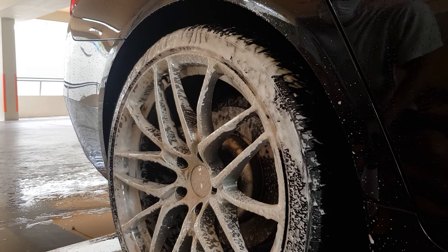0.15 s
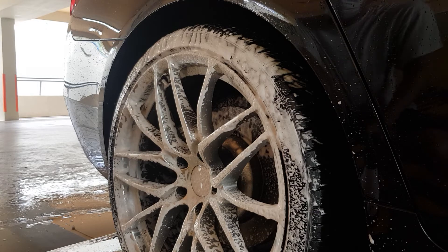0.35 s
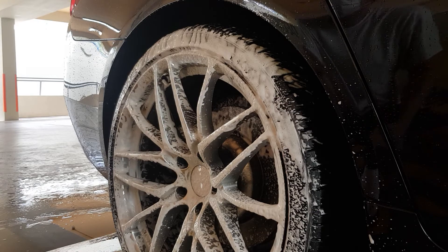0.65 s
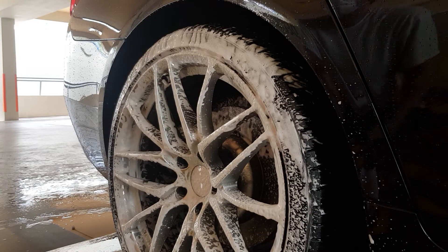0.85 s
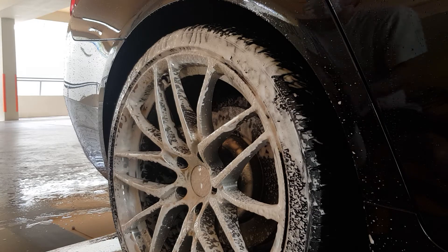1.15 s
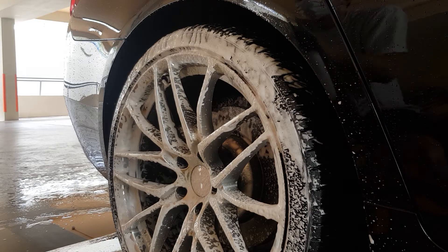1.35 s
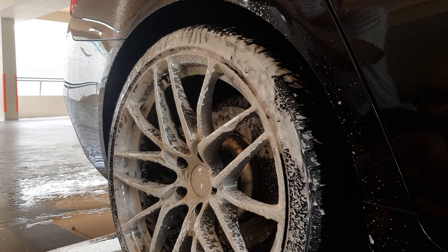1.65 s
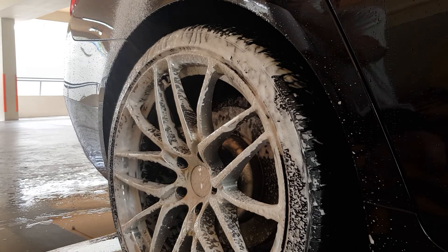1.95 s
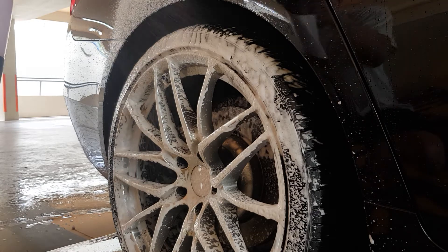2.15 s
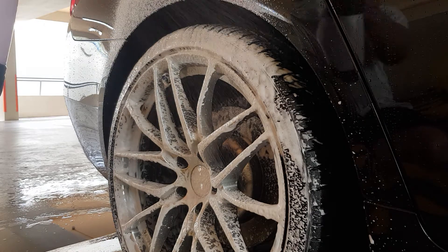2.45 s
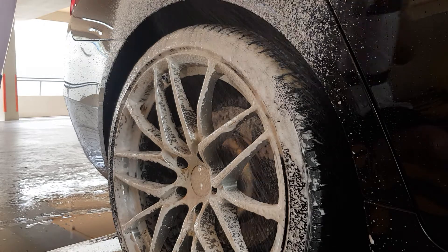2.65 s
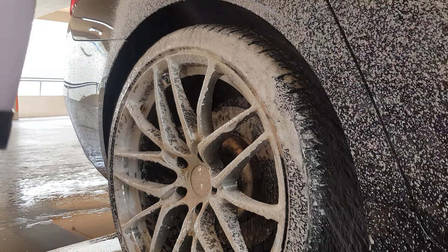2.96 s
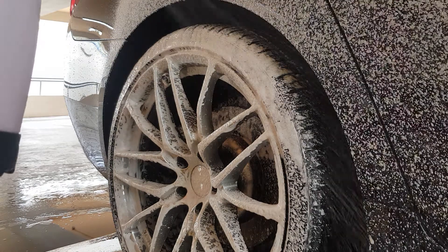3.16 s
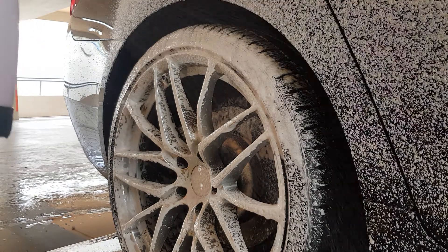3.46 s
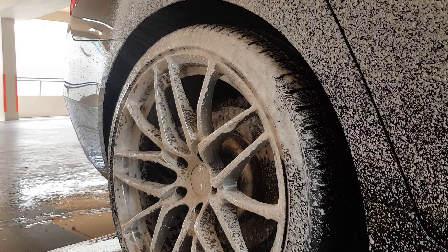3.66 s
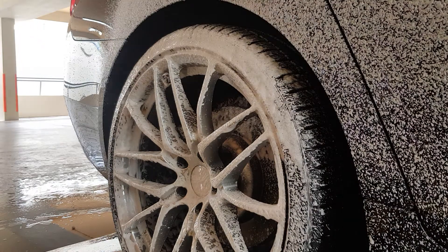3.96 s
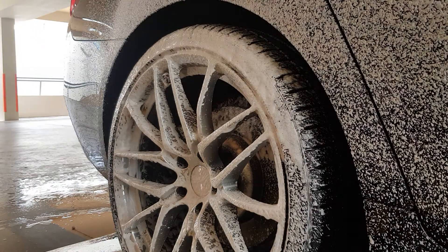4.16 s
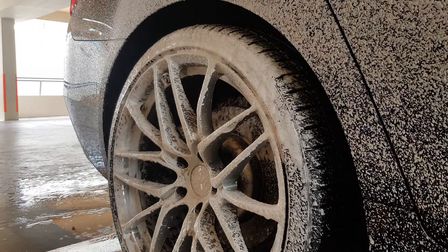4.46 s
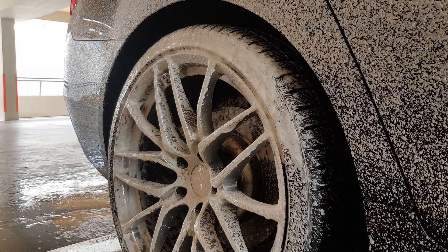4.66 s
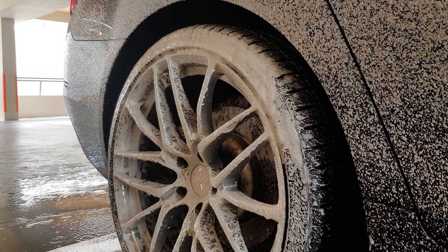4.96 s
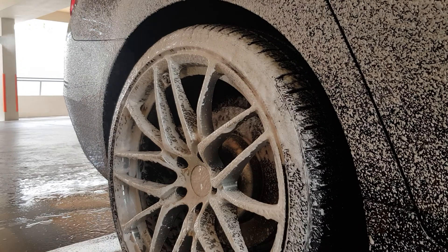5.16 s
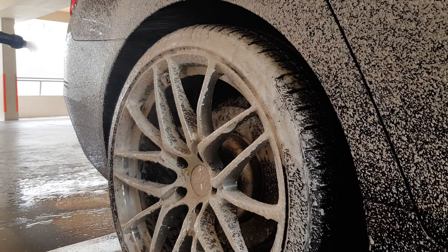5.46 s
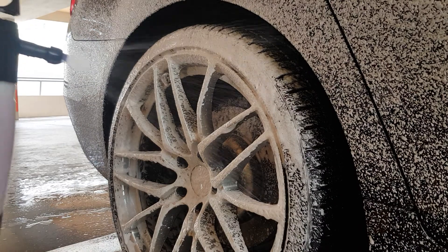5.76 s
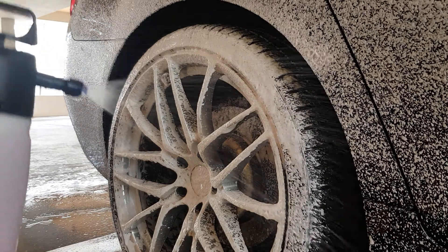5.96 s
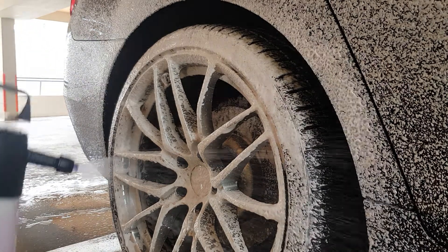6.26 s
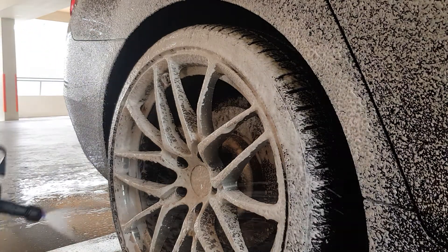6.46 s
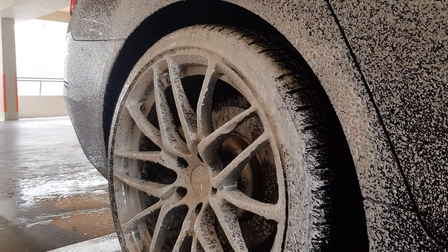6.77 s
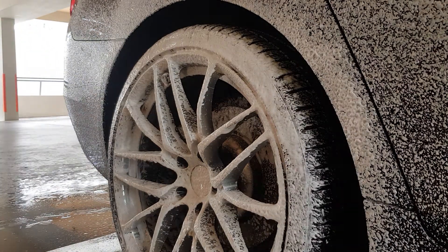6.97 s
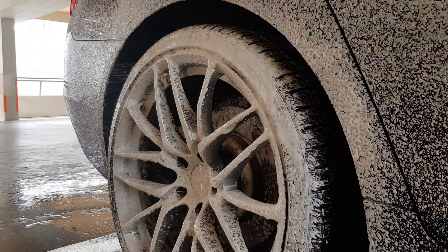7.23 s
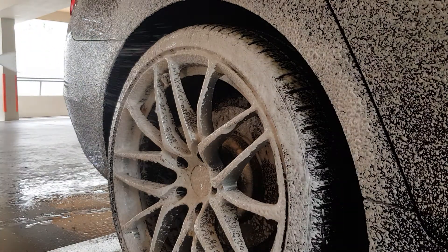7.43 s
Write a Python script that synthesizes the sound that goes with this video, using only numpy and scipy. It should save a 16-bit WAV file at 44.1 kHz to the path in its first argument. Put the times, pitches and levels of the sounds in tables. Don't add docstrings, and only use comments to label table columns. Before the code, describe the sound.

Low engine and traffic rumble fills an open parking garage. Close by, slightly left, a hand-pump sprayer gets one last stroke: plastic knocks, a short rising squeak, a hard clack and a fizz of escaping air that fades with small ticks. After about a second and a half the trigger opens with a sharp spurt, and a bright foam hiss continues to the end, swelling and thinning as it sweeps over wheel and panel. Close stereo phone microphone.

```python
import sys
import numpy as np
from scipy import signal
from scipy.fft import rfft, irfft
from scipy.io import wavfile
from scipy.ndimage import uniform_filter1d

SR = 44100
rng = np.random.default_rng(int(sys.argv[2]) if len(sys.argv) > 2 else 0)


def ratio(d):
    e = np.asarray(d, float) / 20
    return 10 ** e


def dump_mix(stems):
    frames = np.atleast_2d(stems).T
    limited = np.clip(frames, -1, 1)
    pcm = np.round(limited * 32767).astype(np.int16)
    wavfile.write(sys.argv[1], SR, pcm)


N = 335160
T = np.arange(N) / SR
F = np.maximum(np.arange(N // 2 + 1) * SR / N, 1)
LEFT_RIGHT = np.array([[1], [-1]])
TOP_HZ = 15790
VALVE_OPENS_S = .217
# (time [s], jet hiss [dB], left minus right [dB])
OPENING = [
    (1.5535, -62, -1),
    (1.557, -42, 1.5),
    (1.566, -27.5, 4),
    (1.573, -22, 4),
    (1.58, -22.5, 5),
    (1.592, -23, -1),
    (1.6, -30.5, 0.1),
    (1.635, -29.5, -1),
    (1.78, -33, -0.9),
]


def unit(x):
    return x / np.sqrt(np.mean(x ** 2))


def curves(rows):
    s, *columns = np.transpose(rows)
    return [np.interp(T, s, c) for c in columns]


def swells(rows):
    return sum(db * np.exp(-.5 * ((T - s) / (length / 2)) ** 2) for s, db, length in rows)


def walk(rate):
    k = int(SR / rate)
    held = np.repeat(rng.standard_normal(N // k + 1), k)
    return 1.3 * uniform_filter1d(uniform_filter1d(held, k), k)[:N]


def on_log_hz(points, hz):
    f, v = np.transpose(points)
    return np.interp(np.log(hz), np.log(f), v)


def shaped(x, gain):
    return irfft(rfft(x) * gain, N)


def band(lo_hz, hi_hz):
    return 1 / np.sqrt((1 + (lo_hz / F) ** 8) * (1 + (F / hi_hz) ** 8))


def modes(table):
    return sum(ratio(db) * 1j * F * w / (hz ** 2 - F ** 2 + 1j * F * w) for hz, w, db in table)


def humps(table):
    return np.sqrt(sum(np.abs(modes([row])) ** 2 for row in table))


def late(x, *delays_ms):
    fine = 4 * irfft(rfft(x), 4 * N)
    return [np.interp(4 * (T - ms / 1000) * SR, np.arange(4 * N), fine) for ms in delays_ms]


def traffic():
    # (time [s], frequency [Hz], level [dB])
    boom_rows = [(0.0, 60.6, -31.5), (0.32, 65.1, -27.5), (0.55, 57.2, -32.5), (0.99, 65.17, -33),
                 (1.2, 54.65, -33), (2.05, 58, -33.5), (2.24, 66.16, -35.5), (2.58, 67.5, -36),
                 (2.88, 55.7, -37), (3.64, 55.05, -32.5), (4.38, 61.35, -43), (4.68, 61.2, -37.5),
                 (4.78, 55, -34.5), (5.06, 61.1, -40), (5.29, 53.3, -44.5), (5.8, 50.6, -37),
                 (7.49, 57.6, -36.5), (7.6, 59.5, -46)]
    # (time [s], extra level [dB], length [s])
    throb_rows = [(.08, 3, 0.087), (.42, -3.5, .1), (1.42, 3, 0.05), (1.55, -4, 0.087), (1.69, 5.5, .1),
                  (1.95, 4, .08), (2.02, -4, .08), (2.35, 3, 0.2), (3.92, -10, .1), (4.0, 4, 0.057),
                  (4.21, 10, 0.067), (4.52, 3.5, 0.11), (4.73, 5, 0.091), (4.82, -8, 0.062), (5.37, 9, .1),
                  (5.88, 3.5, 0.11), (6.0, 4, 0.085), (6.6, -4, .2), (7.15, 2, 0.17)]
    # (time [s], extra level [dB], length [s])
    surge_rows = [(.9, 6, .25), (1.3, 7.5, 0.27), (1.7, 2.5, .15), (1.95, 5.5, 0.11), (2.37, 4, 0.17),
                  (3.0, 5.5, 0.19), (3.22, 2, 0.14), (3.82, 4.5, 0.18), (4.7, 5, 0.068), (4.82, 3.5, .15),
                  (5.37, 6.5, 0.077), (6.77, 1.5, .3)]
    # (time [s], frequency [Hz], level [dB])
    engine_rows = [
        (6.3, 106.5, -59),
        (6.408, 99.1, -37.5),
        (6.686, 104.5, -36.5),
        (7.078, 109, -37),
        (7.2, 105.7, -43),
        (7.6, 117.7, -33),
    ]
    # (time [s], extra level [dB], length [s])
    hum_rows = [(1.3, 10, .5), (1.7, 6.5, .2), (2.45, 13, .2), (2.95, 7.5, 0.42), (3.25, 14.5, 0.29),
                (4.2, 9, .4), (5.0, 6, .4)]
    # (time [s], level [dB])
    flow_rows = [(0, -42.5), (.35, -46), (1.6, -47), (3.0, -49.5), (4.0, -50.5), (4.6, -48.5), (5.2, -50),
                 (6.05, -47), (7.6, -48.5)]
    # (frequency [Hz], density [dB per Hz])
    hall_spectrum = [(88, -20), (150, -15), (182, -11.5), (447, -16.5), (588, -21), (623, -19.5),
                     (852, -21.5), (1530, -28), (2440, -36.5), (2750, -35.5), (15900, -70)]
    # (frequency [Hz], correlation [1])
    likeness_rows = [(60, 0.91), (130, 0.89), (290, 0.83), (640, 0.64), (1410, -0.85), (3100, -0.096),
                     (6820, -0.17), (15000, 0.31)]

    boom_hz, boom_db = curves(boom_rows)
    boom_db = boom_db + swells(throb_rows)
    wash_db, = curves(flow_rows)
    drone_db = -38.5 + 0.11 * (wash_db - wash_db.mean()) + swells(surge_rows)
    boom = np.sin(2 * np.pi * np.cumsum(boom_hz + 2.48 * walk(15)) / SR) * ratio(0.5 * walk(27.0))
    boom = unit(unit(boom) + 0.65 * unit(shaped(rng.standard_normal(N), band(51.4, 69.5) ** 2)))
    drone = unit(shaped(rng.standard_normal(N), band(86.6, 126.7) ** 2))
    engine_hz, engine_db = curves(engine_rows)
    engine = ratio(engine_db) * np.interp(T, [6.2, 6.4], [0, 1]) * np.sin(2 * np.pi * np.cumsum(engine_hz) / SR)
    hum = unit(shaped(rng.standard_normal(N), modes([(135.8, 9, 0)]) ** 2))
    hum = ratio(-57 + swells(hum_rows)) * hum

    likeness = np.clip(on_log_hz(likeness_rows, F), 0, 1)
    mid, side = rfft(rng.standard_normal((2, N))) * ratio(on_log_hz(hall_spectrum, F))
    wash = irfft(mid * np.sqrt(1 + likeness) + LEFT_RIGHT * side * np.sqrt(1 - likeness), N)
    reference_db = np.interp(1.3, T, uniform_filter1d(wash_db, SR // 3))
    wash = unit(wash) * ratio(-45.5 + wash_db - reference_db)
    side_bass = ratio(-22) * unit(shaped(rng.standard_normal(N), band(42, 153) ** 2)) * ratio(boom_db)
    bass = ratio(boom_db) * boom + ratio(drone_db - 2.5) * drone + engine + hum + LEFT_RIGHT * side_bass
    return (bass + wash) * ratio(-.6 * LEFT_RIGHT)


def vent():
    # (time [s], level [dB])
    rub_rows = [
        (0, -62),
        (.058, -46),
        (.09, -53),
        (.13, -56),
        (.16, -59),
        (.214, -52),
    ]
    # (time [s], level [dB])
    pressure_rows = [
        (.219, -36.5),
        (.262, -36),
        (.275, -50.5),
        (.42, -46.5),
        (.5, -50),
        (.62, -58.5),
        (.68, -57.5),
        (.9, -66),
        (1.0, -77),
    ]
    # (frequency [Hz], width [Hz], level [dB])
    tube_rows = [(1800, 600, 0), (2340, 500, -1), (3800, 500, -6), (4550, 450, -4), (7200, 900, -16)]
    # (frequency [Hz], width [Hz], level [dB])
    valve_rows = [(11200, 1000, -4), (12450, 1300, 0), (15200, 1400, 0)]
    # (frequency [Hz], width [Hz], level [dB])
    reed_rows = [(5440, 210, 0)]

    low_db, = curves(rub_rows + pressure_rows)
    gate, opened = np.interp(T, [.95, 1.15], [1, 0]), T > VALVE_OPENS_S
    age = T - VALVE_OPENS_S
    burst_db = 0.5 * (T < .268)
    high_db = low_db + np.where(opened, 1 - 2 * age + burst_db, 0)
    reed_db = low_db - 5.5 - 14 * age + burst_db
    rub, air, edge = rng.standard_normal((3, 2, N))
    tube = unit(shaped(air, humps(tube_rows) ** 1.5 + .03 * band(1000, 9000)))
    valve = unit(shaped(edge, humps(valve_rows) ** 2 + .04 * band(8000, SR)))
    tube = np.where(opened, tube, unit(shaped(rub, band(860, 4700) + .1 * band(4000, 8000))))
    valve = np.where(opened, valve, unit(shaped(rub, band(9000, SR))))
    reed = opened * unit(shaped(edge, modes(reed_rows) ** 2))
    tube = ratio(low_db + 2 * walk(61.4)) * tube
    valve = ratio(high_db + 1.8 * walk(61.2)) * valve
    reed = ratio(reed_db + 2.3 * walk(78.0)) * reed
    return gate * (tube + valve + reed)


def knocks():
    # (time [s], peak [dB], thud re peak [dB], clack re peak [dB], tick re peak [dB])
    blows = [(0.0601, -22.5, 7, -38, -18), (0.0726, -24, -19, -32, -7), (0.1216, -29.5, -15, -25, -20),
             (0.2161, -15.5, -15, -32, -39), (0.231, -36, -15, -10, -15), (0.2558, -27.5, -23, -2, -17),
             (0.43, -33.5, -14, -7, -11), (0.644, -38, -13, -29, -6), (0.6823, -47, 9, -22, -12),
             (0.731, -48, -7, -6, -15), (0.757, -55, -13, 10, -11), (0.779, -49, -2, -15, -15),
             (0.88, -42, -4, -24, -23), (0.9048, -39, -14, -28, -21), (0.935, -45, 5, -24, -23)]
    # (frequency [Hz], width [Hz], level [dB])
    tank_modes = [(790, 70, 10), (1634, 90, 5), (2450, 110, 7), (2730, 120, -2), (3540, 200, -4),
                  (3930, 200, -8)]
    # (frequency [Hz], width [Hz], level [dB])
    stop_modes = [(417, 326, 15), (980, 78, -11), (1930, 84, -11), (2530, 320, -7.5), (3430, 115, 4.5),
                  (5430, 95, -20)]

    noise = rng.standard_normal(N)
    ranges_hz = (1400, 5500), (400, 1400), (5500, 9000), (9000, TOP_HZ)
    body, thud, clack, tick = (unit(shaped(noise, band(*hz))) for hz in ranges_hz)
    on_tank, at_stop, bare = np.zeros((3, N))
    for s, db, thud_db, clack_db, tick_db in blows:
        age = np.maximum(T - s, 0)
        blow = ratio(db - 5.5) * (1 - np.exp(-age / 0.00031)) * ratio(-60 * age / 0.023)
        snaps = abs(s - VALVE_OPENS_S) < .005
        strike = 3 * snaps * np.exp(-age / .0015) * np.sin(2 * np.pi * 2750 * age)
        struck = at_stop if s > .2 else on_tank
        struck += blow * (body + ratio(thud_db) * thud + strike)
        bare += blow * (ratio(clack_db) * clack + ratio(tick_db) * tick)
    ringing = shaped(on_tank, modes(tank_modes) + 0.55) + shaped(at_stop, modes(stop_modes) + 0.22)
    return ratio(4.0) * ringing + bare


def squeak():
    # (time [s], frequency [Hz], level [dB])
    pitch_rows = [
        (.1, 830, -44),
        (.115, 880, -44),
        (.135, 935, -45),
        (.16, 965, -43),
        (.19, 995, -40),
        (.218, 1030, -34.5),
    ]
    # (multiple [1], level [dB])
    partials = [(1, 0), (2, -14), (3, -33), (4, -31), (5, -27), (6, -29), (7, -29), (8, -33)]
    hz, db = curves(pitch_rows)
    phase = 2 * np.pi * np.cumsum(hz * (1 + .004 * walk(156))) / SR
    gate = np.interp(T, [.092, .102, VALVE_OPENS_S, VALVE_OPENS_S + 0.005], [0, 1, 1, 0])
    tone = sum(ratio(p + 2 * walk(37) * (k > 1)) * np.sin(k * phase) for k, p in partials)
    return np.sqrt(2) * gate * ratio(db) * tone


def whistles():
    # (start [s], end [s], frequency [Hz], level [dB])
    leaks = [
        (.93, 1.0, 14000, -85),
        (1.05, 1.16, 13000, -80),
        (.85, 1.6, 3500, -74),
    ]
    out = 0
    for start, end, hz, db in leaks:
        swell = np.sin(np.pi * np.clip((T - start) / (end - start), 0, 1))
        out = out + ratio(db + 3.5 * walk(44.7)) * swell * np.sin(2 * np.pi * hz * T)
    return out


def pump():
    scattered_share, hall_t60_s, hall_wet_db = (0.87, 0.8), 0.26, -10
    air, scattered = vent()
    near = knocks() + 0.17 * air
    right, floor_left, floor_right = late(near, 0.385, 0.885, 1.366)
    left = near + 0.35 * floor_left + scattered_share[0] * scattered
    right = 0.84 * right + 0.52 * floor_right + scattered_share[1] * np.roll(scattered, 211)
    dry = np.array([left, right]) * ratio(1.0) + squeak() + whistles()
    age = T[:SR]
    tail = signal.lfilter([1], [1, -.6], rng.standard_normal((2, SR))) * ratio(-60 * age / hall_t60_s) * (age > .008)
    tail = tail / np.sqrt(np.sum(tail[0] ** 2))
    return dry + ratio(hall_wet_db) * signal.fftconvolve(dry, tail, axes=1)[:, :N]


def foam(jet_db, near_db, panel_db):
    # (frequency [Hz], density [dB per Hz])
    foam_spectrum = [(290, 30), (500, -14), (621, -14.5), (658, -14), (959, -10), (3380, -14.5),
                     (4510, -14), (7940, -13), (12100, -1), (15000, 3), (15900, -9)]
    # (time [s], extra level [dB], length [s])
    spit_rows = [(1.5765, 2.5, .002), (1.5805, 3, .002), (1.586, 2.5, .002), (1.623, 3, .002),
                 (1.647, 4, .002), (1.677, 4, .002), (1.714, 3, .002), (2.33, 3, .02), (3.14, 1.5, .02),
                 (5.92, 3, .01), (6.88, 3, .02), (7.29, 3, .01), (7.35, 3, .02), (7.56, 5, .01)]
    spurt = np.exp(-np.maximum(T - OPENING[3][0], 0) / 0.15)
    mist_db = -0.1 * panel_db - 0.079 * (near_db + 2) + 9.5 * spurt
    splatter_db = 0.56 * panel_db - 0.2 * (near_db + 15)
    drum_db = panel_db - 10 * spurt
    flow_db = jet_db + swells(spit_rows) + .6 * walk(50) + .9 * walk(120) - 80 * (T < OPENING[0][0])
    colour = ratio(on_log_hz(foam_spectrum, np.minimum(F, foam_spectrum[-2][0])))
    noise = rfft(rng.standard_normal((3, N))) * colour * band(530, SR)
    norm = np.sqrt(np.sum(np.abs(noise[0, F > 9000]) ** 2) * 2) / N
    centres = np.log([1400, 2900, 5800, 12000])  # drum, splatter, mist, bare jet [Hz]
    out = 0
    for hz in 500 * 2 ** np.arange(0, 5.6, .5):
        drum, splatter, mist = (np.interp(np.log(hz), centres, row) for row in np.eye(4)[:3])
        colour_db = mist * mist_db + splatter * splatter_db + drum * drum_db + .5 * walk(19)
        part = np.cos(np.pi * np.clip(np.log2(F / hz), -.5, .5)) ** 2
        out = out + ratio(colour_db) * irfft(noise * part, N)
    return out * ratio(flow_db) / norm


def spray():
    # (time [s], jet hiss [dB], right port lateness [ms], foam on the panel [dB])
    nozzle_rows = [(1.78, -31.5, 0.2, 7.5), (2.15, -30.5, .16, 4), (2.36, -29, .15, 1.5),
                   (2.75, -29.5, .1, 3), (3.0, -27.5, 0.075, 2), (3.16, -27, 0.068, -1),
                   (3.43, -31.5, .125, 1), (3.76, -34, 0.19, 1.5), (4.1, -36, 0.24, -3),
                   (4.5, -38, .27, -5.5), (5.2, -35, .24, -3.5), (5.55, -34.5, .21, -1.5),
                   (5.86, -31.5, .13, -3), (6.25, -29.5, 0.11, -4), (6.6, -33, .18, -1.5),
                   (7.36, -33.5, 0.26, -0.5), (7.52, -31.5, 0.22, -3.5), (7.6, -30, .24, 2)]
    # (time [s], floor echo lateness [ms])
    floor_rows = [(1.5, 1.88), (1.95, 2.02), (2.5, 2.3), (3.0, 2.5), (3.5, 2.1), (4.05, 1.6), (4.4, 1.45),
                  (4.75, 1.46), (5.25, 1.7), (5.75, 1.9), (6.1, 1.92), (6.6, 1.2), (6.9, 1.18), (7.25, 1.4),
                  (7.6, 1.92)]
    # (lateness [ms], level [dB])
    wheel_rows = [(2.6, -10), (3.4, -11), (4.7, -12), (6.1, -13), (8.3, -14)]

    steady_db, port_ms, panel_db = curves(nozzle_rows)
    floor_ms, = curves(floor_rows)
    start_db, swing_db = curves(OPENING)
    pan_db = swing_db - 22 * (0.28 - port_ms)
    near_db = steady_db + 30
    share = np.clip(.48 + .008 * near_db, 0, 1)
    source, *diffuse = foam(np.where(T < OPENING[-1][0], start_db, steady_db), near_db, panel_db)
    echo_ms, echo_db = np.transpose(wheel_rows)
    paths = [ms * (floor_ms / 1.6 + side * port_ms * 0.412) for side in (-1, 1) for ms in echo_ms]
    right, floor_left, floor_right, *echoes = late(source, port_ms, floor_ms, floor_ms + 0.77 * port_ms, *paths)
    wheel = np.einsum("e,cen->cn", ratio(echo_db), np.reshape(echoes, (2, -1, N)))
    floor = ratio(-8 - .6 * near_db) * np.array([floor_left, floor_right])
    near = np.array([source, right]) + floor + wheel
    scattered = shaped(np.array(diffuse), 1 + 0.82 * band(2100, 7000))
    heard = np.sqrt(share) * near + ratio(-2.5) * np.sqrt(1 - share) * scattered
    # lateness [ms], level [dB]
    mount_ms, mount_db = (.44, .56), (-13, -17)
    mount = [ratio(db) * np.roll(c, round(ms * SR / 1000)) for c, ms, db in zip(heard, mount_ms, mount_db)]
    heard = heard + shaped(np.array(mount), band(2000, 10000))
    treble = shaped(heard, band(6800, SR))
    return ratio(4.5) * (heard - treble + treble * ratio(LEFT_RIGHT * pan_db / 2))


def scene():
    return traffic() + pump() + spray()


def band_limit(x):
    return signal.sosfilt(signal.butter(12, 17090, fs=SR, output="sos"), x)


def record(dry):
    hiss = ratio(-76.5) * unit(shaped(rng.standard_normal((2, N)), band(6500, SR)))
    mix = shaped(dry + hiss, np.clip((TOP_HZ - F) / 60, 0, 1))
    return band_limit(mix)


dry = scene()
out = record(dry)
dump_mix(out)
```